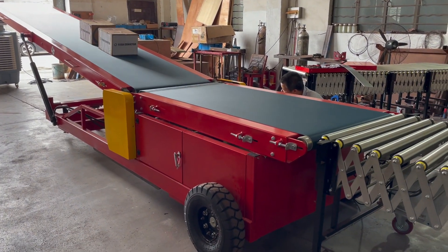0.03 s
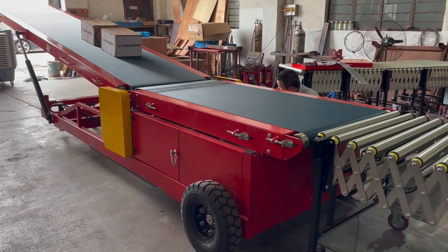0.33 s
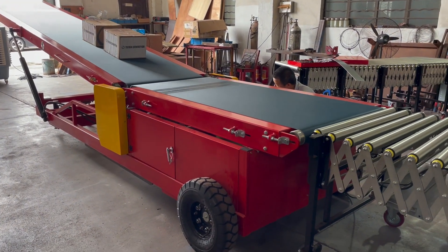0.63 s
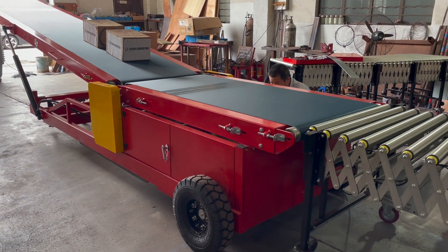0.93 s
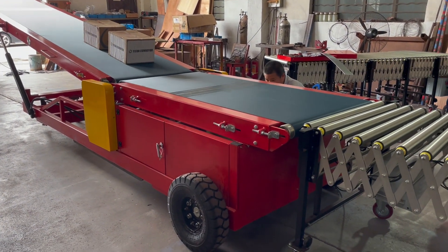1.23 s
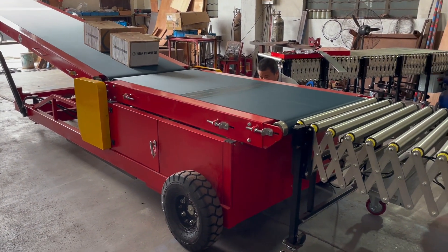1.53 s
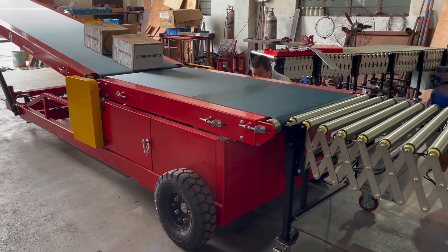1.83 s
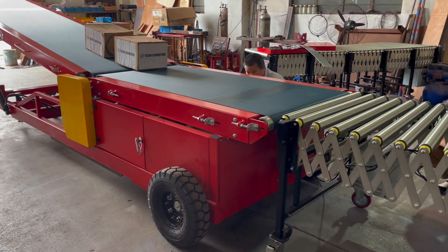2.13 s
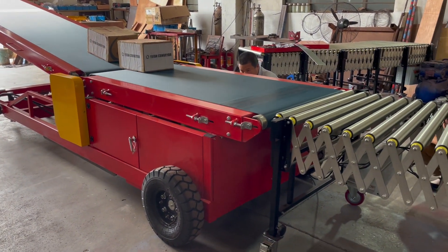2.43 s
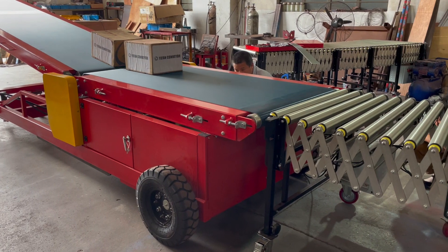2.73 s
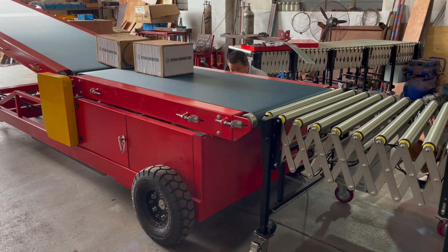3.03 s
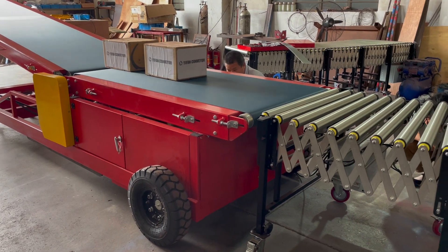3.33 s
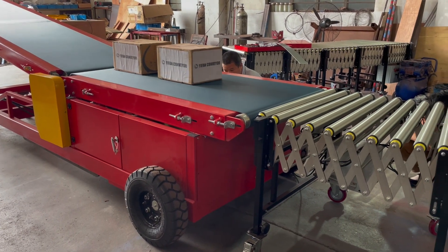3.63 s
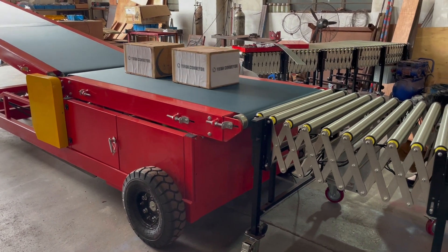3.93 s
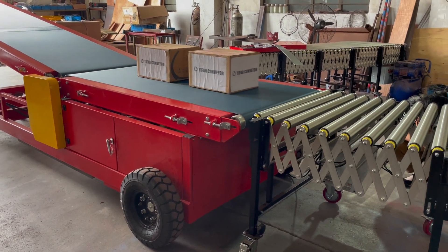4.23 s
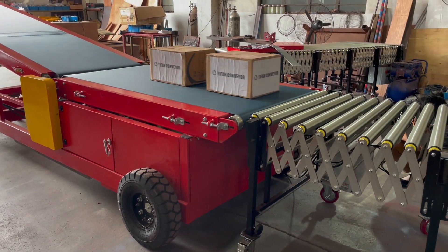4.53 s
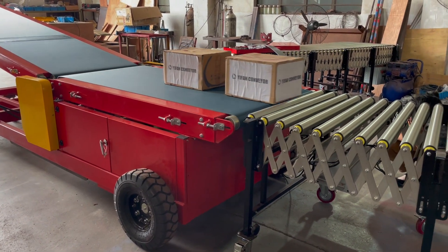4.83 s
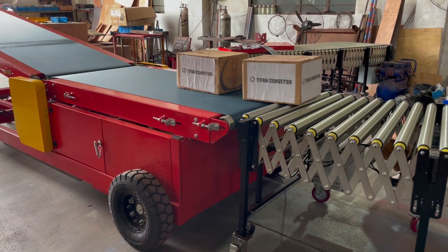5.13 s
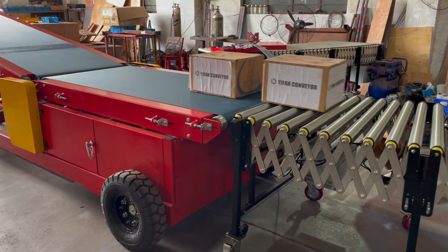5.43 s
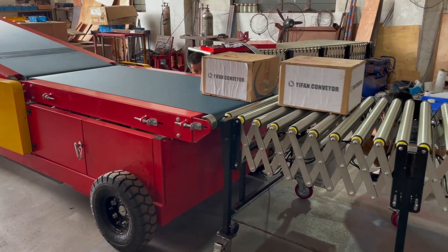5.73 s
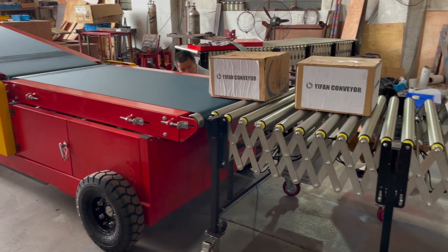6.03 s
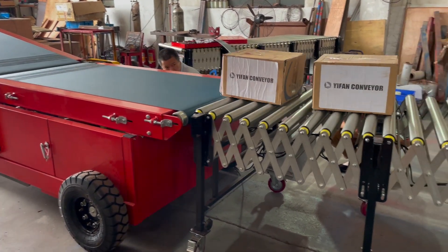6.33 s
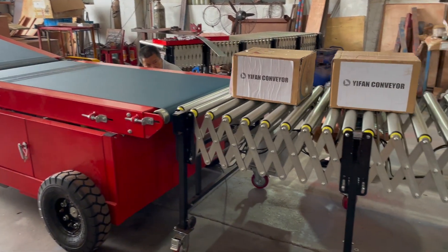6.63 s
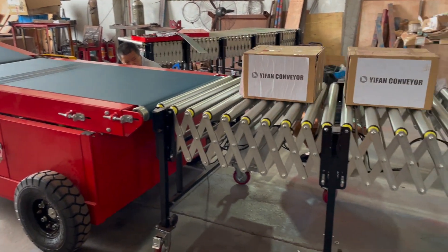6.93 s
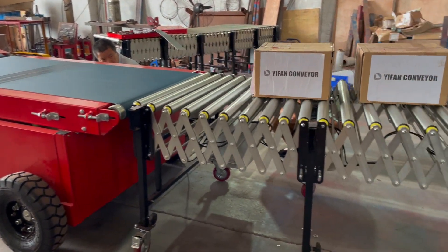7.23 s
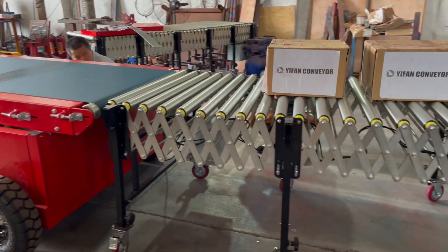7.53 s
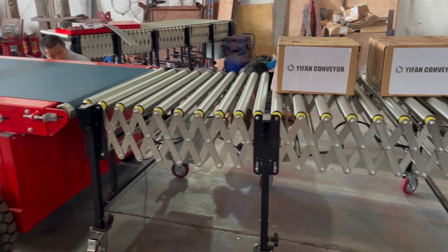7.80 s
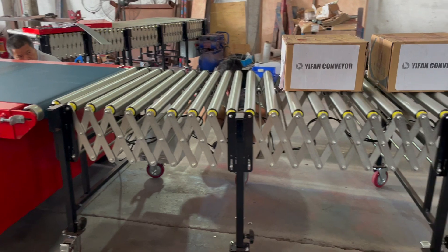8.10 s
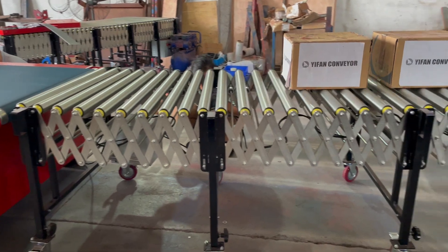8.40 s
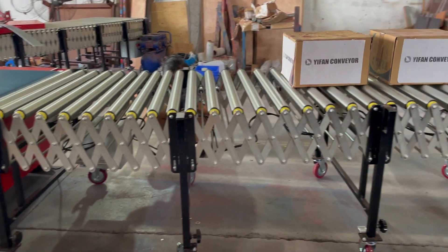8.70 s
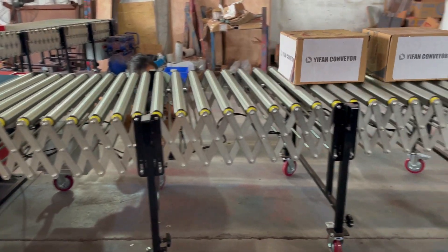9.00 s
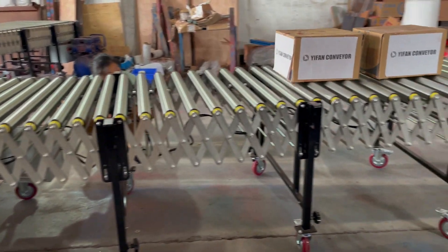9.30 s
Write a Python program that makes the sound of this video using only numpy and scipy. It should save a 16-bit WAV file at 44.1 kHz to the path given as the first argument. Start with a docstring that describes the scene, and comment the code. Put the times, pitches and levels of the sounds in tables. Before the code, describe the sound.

Cardboard boxes bump over a running belt conveyor and clatter onto powered rollers, amid steady motor hum and a high, wavering whine.

```python
"""Two cartons thump over the bend of a belt conveyor, knock onto a powered roller track and trundle away.
The rubber belt hisses over its steel bed, its drum ticks and the frame rumbles; then it runs down to rest.
Inverter-fed motors hum, whistle and beat against each other. The blows echo in a workshop hall.
A two-port microphone is carried along from the belt to the rollers."""
import sys
import numpy as np
from scipy import signal
from scipy.fft import rfft, irfft
from scipy.io import wavfile
from scipy.ndimage import uniform_filter1d, map_coordinates

SR = 44100
rng = np.random.default_rng(int(sys.argv[2]) if len(sys.argv) > 2 else 0)


def persist_wave(psi):
    """Save psi, clipped to +-1, as 16-bit WAV."""
    counts = np.round(np.clip(psi, -1, 1) * 32767).astype(np.int16)
    wavfile.write(sys.argv[1], SR, np.atleast_2d(counts).T)


N = 412776
TIME, FREQS = np.arange(N) / SR, np.fft.rfftfreq(N, 1 / SR)
LAND_S, CROSS_S = 4.83, 0.21  # cartons reach the rollers; time to load them
PASS_S, PASS_WIDTH_S = 6.3, 0.72  # cartons pass closest

# Belt rub, falling as the belt slows and the microphone moves on. Each row: time in s, relative dB.
RUB_LEVEL = [(0.1, -37.5), (0.33, -37.5), (6.16, -38), (7.18, -40.5), (8.18, -49.5), (9.25, -50)]
# Spectrum of the belt's crackles and drum ticks. Each row: frequency in Hz, gain in dB.
TICK_SPECTRUM = [(1500, -15), (4000, 6.5), (6200, 4), (9000, 2), (11300, -2.5), (15000, -15)]


def gain_of(db):
    """Decibels to amplitude."""
    return 10 ** (np.asarray(db) / 20)


def unit_rms(x):
    """Scale to rms 1."""
    return x / np.sqrt(np.mean(abs(x) ** 2) + 1e-20)


def over_hz(points, hz=FREQS, column=1):
    """Table column interpolated over log frequency."""
    table = np.transpose(points)
    return np.interp(np.log(hz + 1), np.log(table[0] + 1), table[column])


def over_time(points):
    """Rows of time and value, interpolated per sample."""
    return np.interp(TIME, *np.transpose(points))


def shaped(x, spectrum):
    """Filter by rows of Hz and dB."""
    return irfft(rfft(x) * gain_of(over_hz(spectrum)), N)


def add(mix, start_s, sound):
    """Mix a sound in at start_s."""
    part = mix[max(round(start_s * SR), 0):][:len(sound)]
    part += sound[:len(part)]


def ramp(start_s, length_s):
    """Linear rise from 0 to 1."""
    return np.clip((TIME - start_s) / length_s, 0, 1)


def swell(peak_s, width_s):
    """Gaussian bump of height 1."""
    return np.exp(-.5 * ((TIME - peak_s) / width_s) ** 2)


def drift(rate_hz):
    """Smooth random curve, rms about 1."""
    knots = rng.standard_normal(1024)
    steps = np.arange(0, N, 128)
    curve = map_coordinates(knots, [steps / SR * rate_hz + 8], mode="wrap")
    return np.interp(np.arange(N), steps, curve)


def walk(beside_belt, beside_rollers):
    """Crossfade a value as the belt falls quiet and the microphone leaves it for the rollers."""
    rub_db = over_time(RUB_LEVEL)
    away = (rub_db.max() - rub_db) / np.ptp(rub_db)
    return beside_belt + (beside_rollers - beside_belt) * away


def belt_speed():
    """Share of full speed: steady, then a linear run-down to rest."""
    return 1 - ramp(start_s=6.817, length_s=2.0)


def noise(spectrum, lo_hz, hi_hz, patchy_db):
    """Two independent noises with shared flickering patches, rms 1 inside the band."""
    grid = (N // 256 + 5, 513)  # frames, bins
    patches = uniform_filter1d(rng.standard_normal(grid), 7, axis=0)
    patches = unit_rms(uniform_filter1d(patches, 40, axis=1))
    cells = rng.standard_normal((2, *grid)) + 1j * rng.standard_normal((2, *grid))
    cells *= gain_of(patchy_db * patches)
    white = signal.istft(cells.transpose(0, 2, 1), nperseg=1024, noverlap=768)[1][:, :N]
    colour = gain_of(over_hz(spectrum))
    colour /= np.sqrt(np.mean(colour ** 2 * ((FREQS > lo_hz) & (FREQS < hi_hz))))
    return irfft(rfft(unit_rms(white)) * colour, N)


def tone(hz, fade_db, rough, waver_hz=2):
    """Tone pair that shivers with the machine and fades as the microphone crosses its standing waves."""
    cycles = np.cumsum(hz + waver_hz * drift(6)) / SR + rng.random()
    shiver = 1 + rough * (drift(22) + 1j * drift(22))
    phasor = np.exp(2j * np.pi * cycles) * shiver
    fading = gain_of(fade_db * np.array([drift(4), drift(4)]))
    return unit_rms(np.array([phasor.real, phasor.imag]) * fading)


def ports(pair):
    """Blend two independent signals into the two microphone ports, opposed from 8 to 9.5 kHz."""
    # Each row: frequency in Hz, left-right correlation, left over right in dB, left's lead in rad.
    image = [(60, .88, 0, 0), (170, .9, 0, .1), (330, .83, .3, .3), (650, .44, 3, .75), (1400, .32, 2, .85),
             (2600, .3, .7, .9), (4700, .25, 2.2, .7), (5800, 0, 1, 0), (6900, .22, .4, 0),
             (8200, -.93, 0, 0), (9200, -.92, 0, 0), (10300, .3, 0, 0), (11700, .97, 0, 0)]
    correlation = np.clip(over_hz(image), -1, 1)
    lean = gain_of(over_hz(image, column=2) / 2) * np.exp(.5j * over_hz(image, column=3))
    mid, side = rfft(pair) * np.sqrt([(1 + correlation) / 2, (1 - correlation) / 2])
    return irfft(np.array([(mid + side) * lean, (mid - side) / lean]), N)


def hall(x):
    """Sparse echoes of random sign, each band dying at its own rate."""
    # Each row: frequency in Hz, t60 in s.
    decay = [(60, 0.65), (400, 0.86), (2000, 0.41), (10000, 0.19)]
    taps = rng.choice([-1., 1.], (2, SR)) * (rng.random((2, SR)) < 2000 / SR)
    hz, t, cells = signal.stft(taps, SR, nperseg=256)
    envelope = gain_of(-60 * t / over_hz(decay, hz)[:, None]) * np.minimum(t / 0.063, 1)
    tail = signal.istft(cells * envelope, SR, nperseg=256)[1]
    return signal.fftconvolve(x[None], tail / np.linalg.norm(tail[0]), axes=1)[:, :N]


def standing_waves():
    """Motor tones swell at both ports as the microphone passes through their loud spots."""
    # Each row: peak time in s, frequency in Hz, level in dB, half width in s.
    loud_spots = [(7.72, 7945, -61.5, .08), (7.78, 630, -56, .07), (8.0, 7958, -61, .06),
                  (8.03, 587, -56, .08), (8.38, 6998, -61, .08), (8.53, 630, -54, .06),
                  (8.66, 150, -46, .12), (8.68, 587, -53.5, .19), (9.05, 4463, -64, .13),
                  (9.17, 73, -43, .14), (9.2, 587, -53.5, .12)]
    return sum(gain_of(db) * swell(peak_s, width_s) * tone(hz, fade_db=.5, rough=.3, waver_hz=1.5)[0]
               for peak_s, hz, db, width_s in loud_spots)


def inverter():
    """Sidebands whistle around multiples of the switching carrier, converging and dying as the belt stops."""
    # Each row: carrier multiple, offset in drive frequencies, relative dB at full and at half speed.
    sidebands = [(1, -3, -65, -66), (1, -1, -63.5, -72), (1, 3, -60, -78), (1, 4, -64, -80),
                 (2, -16, -71, -67), (2, -6, -68, -78), (2, -2, -65, -56), (2, 0, -65, -67),
                 (2, 2, -64, -62), (2, 6, -66, -75), (3, -3, -88, -72), (3, -1, -88, -74), (3, 3, -88, -74),
                 (3, 5, -88, -76)]
    carrier_hz, drive_hz, boost_db = 4000, 50, 2
    speed, out = belt_speed(), np.zeros((2, N))
    for multiple, offset, full_db, half_db in sidebands:
        level = np.interp(speed, [0, .5, 1], [0, gain_of(half_db), gain_of(full_db)])
        hz = multiple * carrier_hz + offset * drive_hz * speed
        out += level * tone(hz, fade_db=1.5, rough=.4, waver_hz=multiple)
    return gain_of(boost_db) * out


def drives():
    """Motor tones over a steady hum: the belt's sink and fade as it slows, the rollers' come nearer."""
    # Belt drive. Each row: frequency in Hz, level in dB, both at full speed.
    belt_tones = [(402, -52.5), (897, -58), (996, -52.5)]
    # Roller drives. Each row: frequency in Hz, dB beside the belt, dB beside the rollers.
    roller_tones = [(247.6, -60, -55.5), (587, -62, -58), (634, -61, -62), (877, -56, -59),
                    (3165, -62, -59), (3537, -63, -60), (3677, -70, -64), (3768, -70, -62),
                    (3822, -64, -60), (4463, -69, -64.5), (4581, -72, -66), (4942, -61, -61),
                    (6998, -62, -61), (7224, -71, -69), (7355, -65, -65), (7757, -70, -68),
                    (8236, -64, -66), (8479, -72, -67), (9001, -68, -64)]
    # Motor hum. Each row: frequency in Hz, level in dB.
    hum = [(49.3, -47), (150.2, -44.5)]
    rub_db, speed = over_time(RUB_LEVEL), belt_speed()
    out = sum(gain_of(db) * tone(hz * speed, fade_db=0.5, rough=0.8) for hz, db in belt_tones)
    out *= gain_of(rub_db - np.median(rub_db))
    for hz, far_db, near_db in roller_tones:
        out += gain_of(walk(far_db, near_db)) * tone(hz, fade_db=2.5, rough=0.65)
    return out + sum(gain_of(db) * tone(hz, fade_db=0.6, rough=0.25, waver_hz=0.58) for hz, db in hum)


def whine():
    """Roller motors a few hertz apart beat unevenly, more deeply beside the rollers."""
    # Swells along the way. Each row: time in s, relative level in dB.
    swells = [(0, -74), (.11, -54), (.38, -66), (.78, -56), (.97, -60), (1.17, -52.5), (1.63, -70),
              (2.12, -60), (2.24, -55), (2.48, -56.5), (2.87, -51.5), (3.1, -59), (3.27, -53.5),
              (3.65, -62.5), (3.93, -53), (4.09, -60), (4.19, -51), (4.4, -50), (4.62, -54.5), (4.77, -51),
              (5.03, -66), (5.25, -54), (5.47, -56.5), (5.75, -53.5), (6.1, -61.5), (6.88, -64),
              (6.96, -55.5), (7.28, -61), (7.47, -63), (7.66, -50.5), (7.92, -59), (8.25, -52),
              (8.39, -56.5), (8.49, -52.5), (8.8, -56.5), (8.92, -53), (9.03, -57), (9.15, -54),
              (9.36, -68)]
    pitch_hz, second_offset_hz, third_offset_hz = 4822, 9.37, 2.3
    crest_s, port_db = 8.39, (7, 2.5)
    share = walk(0.22, 0.65) * gain_of(np.array([drift(3.2), drift(3)]))  # second motor over first
    second = np.exp(1j * (2 * np.pi * second_offset_hz * (TIME - crest_s) + .35 * drift(12)))
    third = .24 * np.exp(2j * np.pi * (third_offset_hz * TIME + rng.random()))
    mirror = .1 * np.conj(second)
    beat = (1 + share * (second + mirror + third)) / np.sqrt(1 + share ** 2)
    cycles = pitch_hz * TIME + np.cumsum(1.08 * drift(4.4)) / SR
    left, right = beat * np.exp(2j * np.pi * cycles)
    port_shift = np.exp(1j * (.5 + .5 * drift(2.09)))  # phase moves with the microphone
    flicker_db = .8 * drift(20)
    level = np.outer(gain_of(port_db), gain_of(over_time(swells) + flicker_db))
    return np.sqrt(2) * level * np.array([left.real, (right * port_shift).real])


def rattle():
    """Tiny metallic ticks of the rollers, loudest as the cartons pass closest."""
    ticks_per_s, level_db = 90, -62
    t = np.arange(1000) / SR
    strikes = rng.random(N) * (rng.random(N) < ticks_per_s / SR)
    power = abs(signal.oaconvolve(strikes ** 2, np.exp(-t / .0015))[:N])
    bursts = np.sqrt(power) * rng.standard_normal((2, N))
    bright = unit_rms(np.diff(bursts, prepend=0))
    return bright * gain_of(level_db) * swell(PASS_S, PASS_WIDTH_S)


def rollers():
    """Hollow trundle of the rollers, stronger under the cartons until they roll out of earshot."""
    # Each row: frequency in Hz, relative density in dB.
    spectrum = [(90, -22), (200, 2), (300, 3), (400, 0.5), (520, -4), (640, -6.5), (780, -5.5),
                (1100, -7.5), (1700, -13.5), (2600, -33), (3700, -11), (5500, -48)]
    load_db = 2.5 * ramp(LAND_S, CROSS_S) * (1 - ramp(start_s=7.8, length_s=1))
    return noise(spectrum, 215, 660, patchy_db=1.0) * gain_of(walk(-42, -45) + load_db)


def frame():
    """The steel frame rumbles; it eases, most in the deep bass, once the cartons leave the belt."""
    # Each row: frequency in Hz, relative density in dB.
    spectrum = [(15, -44), (28, -7), (40, -4.5), (52, 2.5), (63, 3), (78, 0), (100, -3), (130, -1.5),
                (152, -0.5), (178, -6.5), (260, -12.5), (600, -24), (2000, -66)]
    deep_hz, deep_drop_db = 56.7, -11
    landed = ramp(LAND_S, CROSS_S)
    load_db = 1.17 * (1.5 - landed)
    rumble = noise(spectrum, 40, 173, patchy_db=1.5) * gain_of(walk(-37.5, -39.5) + load_db)
    deep = irfft(rfft(rumble) / (1 + (FREQS / deep_hz) ** 10), N)
    return rumble + deep * (gain_of(deep_drop_db * landed) - 1)


def snaps(events, spectrum):
    """Short gritty noise bursts, one per row of start in s and relative dB."""
    out, t = np.zeros((2, N)), np.arange(3000) / SR
    envelope = (1 - np.exp(-t / .001)) * (np.exp(-t / .005) + .13 * np.exp(-t / .03))
    for start_s, db in events:
        for channel in out:
            add(channel, start_s, gain_of(db) * envelope * rng.standard_normal(len(t)))
    return shaped(out, spectrum)


def drum_ticks():
    """The belt drum ticks once a turn, unevenly, and more softly as it comes to rest."""
    first_s, turn_s = 0.008, 0.2593  # at full speed
    speed = belt_speed()
    travel = np.cumsum(speed) / SR
    starts_s = np.interp(np.arange(first_s, travel[-1], turn_s), travel, TIME)
    uneven_db = 1.5 * rng.standard_normal(len(starts_s))
    slowing_db = -5 * np.interp(starts_s, TIME, 1 - speed)
    return snaps(zip(starts_s, -40.5 + uneven_db + slowing_db), TICK_SPECTRUM)


def belt():
    """Rubber rubs over the steel bed; the fizz flutters, crackles and grows as cardboard scuffs past."""
    # Midrange rub and treble fizz. Each row: frequency in Hz, relative density in dB.
    rub_spectrum = [(200, -24), (420, 1.5), (540, 0), (630, 4.5), (720, -3), (950, -0.5), (1450, -4),
                    (2150, 2.5), (2600, -0.5), (3200, -4.5), (4000, -10.5), (4600, -11.5), (5200, -11),
                    (5600, -18.5), (7200, -24), (10000, -58)]
    fizz_spectrum = [(2500, -16), (5000, 6), (6200, 18.5), (7400, 16), (8300, 16.5), (9100, 11), (10000, 5),
                     (11500, 7.5), (13500, 6), (14800, 3.5), (15700, -10)]
    rub = noise(rub_spectrum, 1510, 3500, patchy_db=1.04) * gain_of(over_time(RUB_LEVEL) + 1.0)
    scuff_db = swell(PASS_S, PASS_WIDTH_S)  # peaks at 1 dB
    fizz_db = walk(-60.5, -66.5) + scuff_db
    flutter_db = .35 * drift(30)
    fizz = noise(fizz_spectrum, 10430, 15400, patchy_db=.9) * gain_of(fizz_db + flutter_db)
    grains = rng.standard_normal((2, N)) * (rng.random(N) < 45 / SR)
    crackle = unit_rms(shaped(grains, TICK_SPECTRUM)) * gain_of(fizz_db - 8)
    return rub + fizz + crackle


def bright_clicks():
    """Bright clicks: two strong ticks of the belt drum, and cartons clicking on belt and rollers."""
    # Each row: start in s, relative level in dB.
    clicks = [(.527, -46), (1.047, -48), (1.19, -49), (5.785, -46), (5.86, -52), (6.568, -42),
              (6.712, -47.5), (6.859, -49)]
    # Each row: frequency in Hz, gain in dB.
    spectrum = [(1500, -12), (4000, 7), (9000, 8), (14000, 3), (15700, 0)]
    return snaps(clicks, spectrum)


def blows(hits, modes, rise_s, order=2):
    """Blows ring the modes; long contact leaves the low ones, more so in soft cardboard (higher order)."""
    out, t = np.zeros(N), np.arange(SR // 2) / SR
    for start_s, peak_db, contact_ms in hits:
        ring = np.zeros(len(t))
        for hz, mode_db, t60_s in modes:
            softening = 1 + (hz * contact_ms / 1000) ** order
            ring += gain_of(mode_db - 60 * t / t60_s) * np.sin(2 * np.pi * hz * t) / softening
        ring *= 1 - np.exp(-t / rise_s)
        add(out, start_s, gain_of(peak_db) * ring / abs(ring).max())
    return out


def carton_knocks():
    """Cartons knock on the belt joint and rollers; the heavier track booms a moment later."""
    # Each row: start in s, knock peak in dB, contact time in ms, boom peak in dB.
    hits = [(1.1155, -17.5, 7, -26), (4.8778, -14, 2.2, -31), (4.94, -28, 3, -36), (5.1, -30, 2, -28),
            (5.14, -25, 2, -32), (5.782, -17.5, .1, -36), (5.7868, -17, 1.1, -22), (5.978, -28, 3, -23.5),
            (6.285, -26, 2, -26), (7.13, -28, 1.5, -32), (8.366, -26, 4, -31)]
    # Modes of a carton and of the roller track. Each row: frequency in Hz, relative dB, t60 in s.
    carton_modes = [(235, -5.5, .034), (310, 0, .031), (390, 1.5, .027), (730, -4, .028), (930, -1, .028),
                    (1340, -1, .028), (1530, -6, .025)]
    track_modes = [(77.6, -19, 0.058), (123.4, -8.5, 0.22), (203, -12, 0.061)]
    knocks = blows([hit[:3] for hit in hits], carton_modes, rise_s=.004, order=4)
    track_hits = [(start_s + 0.0094, boom_db, contact_ms) for start_s, _, contact_ms, boom_db in hits]
    return knocks, blows(track_hits, track_modes, rise_s=0.0011)


def carton_thumps():
    """Cartons ride over the bend in the belt and ring its bed."""
    # Each row: start in s, peak in dB, contact time in ms.
    hits = [(.495, -21, 2.7), (.94, -19, 3.5), (.975, -19, 2.1), (1.012, -18, 5.1), (1.104, -12.5, 5.7),
            (1.123, -13.5, 6.8), (1.156, -21, 7), (1.27, -24, 7.4), (1.352, -28, 12), (1.56, -23, 2.6),
            (1.915, -21, 10), (1.975, -22.5, 8.6), (2.555, -19.5, 24), (2.88, -25, 1.3), (3.04, -24, 4.6),
            (3.8, -22.5, 8), (3.915, -18.5, 2.8)]
    # Each row: frequency in Hz, relative level in dB, t60 in s.
    bed_modes = [(60.5, 2, 0.13), (78.7, 5, 0.085), (94.8, 4.5, 0.092), (116, -1.5, 0.12), (162, 4.5, 0.08),
                 (237, -13, 0.092), (324, -7, 0.041)]
    return blows(hits, bed_modes, rise_s=0.016)


def scene():
    """The running machine, the cartons' blows and their echo, in stereo."""
    thumps = carton_thumps()
    knocks, booms = carton_knocks()
    echo = hall(gain_of(-15) * (thumps + booms) + gain_of(-17.5) * knocks)
    port_phase_rad = np.array([[.28], [-.28]])  # thumps reach the ports out of step
    wide_thumps = (signal.hilbert(thumps) * np.exp(1j * port_phase_rad)).real
    machine = belt() + frame() + rollers() + drives() + inverter() + drum_ticks()
    diffuse = ports(machine + bright_clicks() + rattle() + echo)
    return diffuse + whine() + standing_waves() + wide_thumps + knocks + booms


def record(dry):
    """Microphone bass roll-off and treble band limit."""
    bass_hz, edge_hz = 32, 15700
    thinned = irfft(rfft(dry) * FREQS ** 4 / (FREQS ** 4 + bass_hz ** 4), N)
    lowpass = signal.firwin(511, edge_hz, window=("kaiser", 9), fs=SR)
    return signal.oaconvolve(thinned, lowpass[None], "same")


dry = scene()
out = record(dry)
persist_wave(out)
```